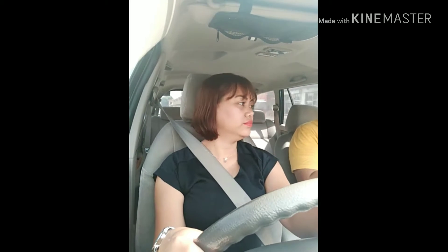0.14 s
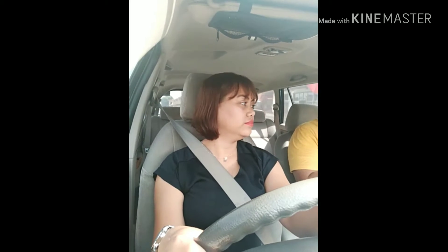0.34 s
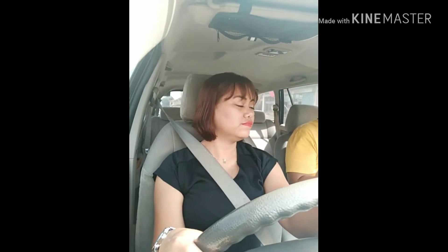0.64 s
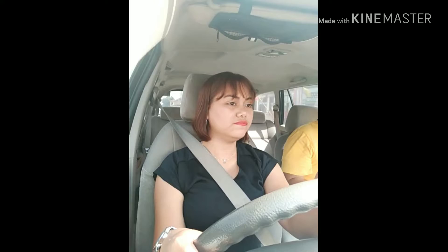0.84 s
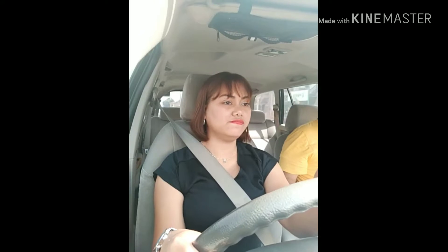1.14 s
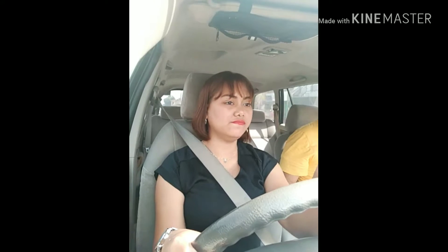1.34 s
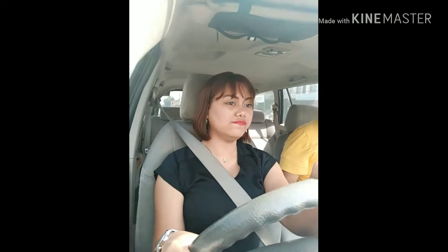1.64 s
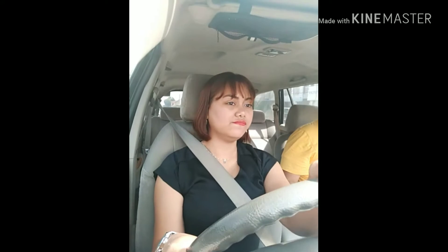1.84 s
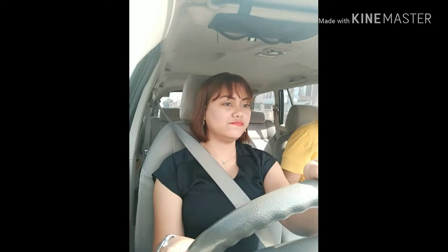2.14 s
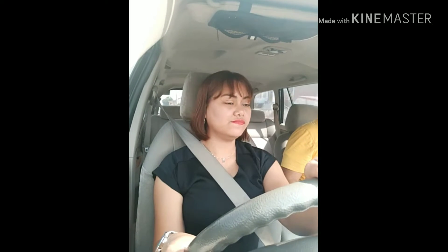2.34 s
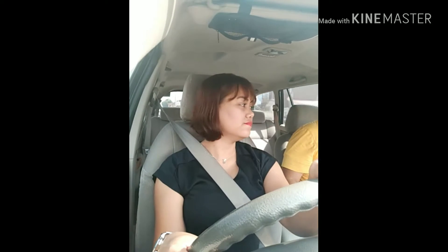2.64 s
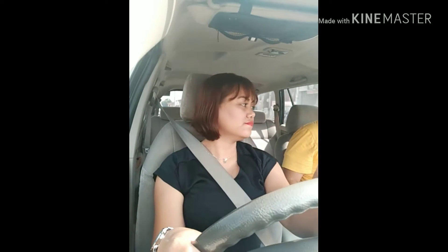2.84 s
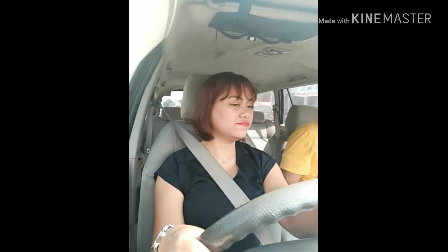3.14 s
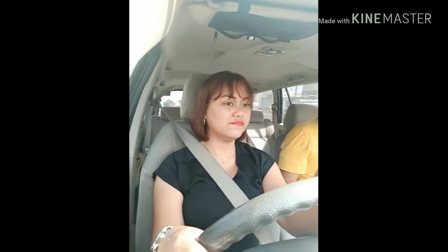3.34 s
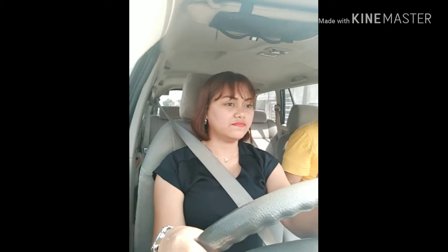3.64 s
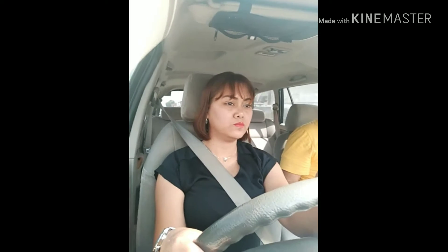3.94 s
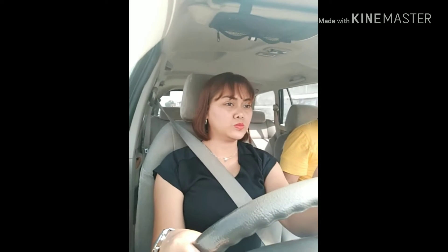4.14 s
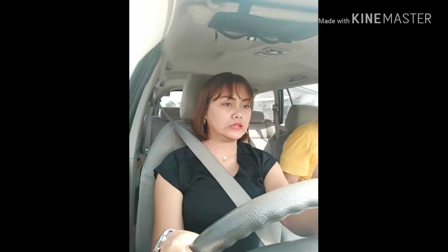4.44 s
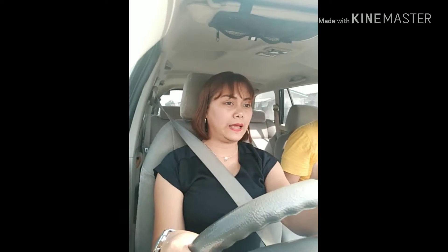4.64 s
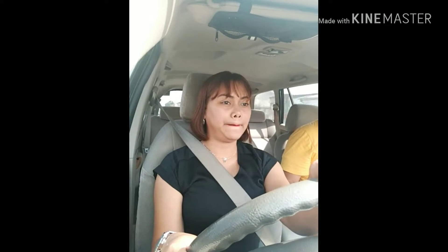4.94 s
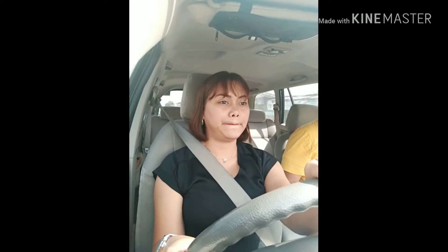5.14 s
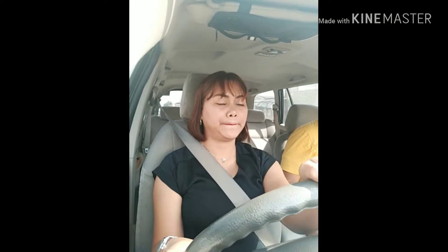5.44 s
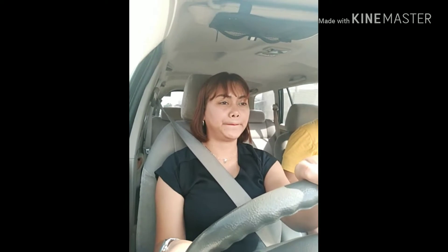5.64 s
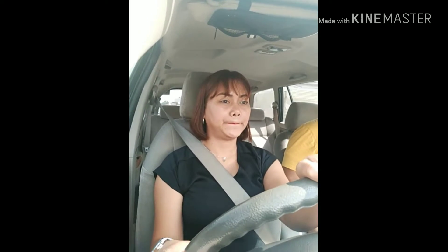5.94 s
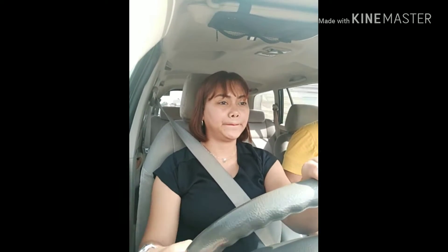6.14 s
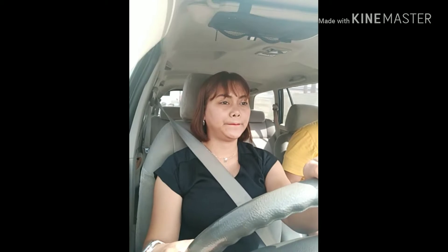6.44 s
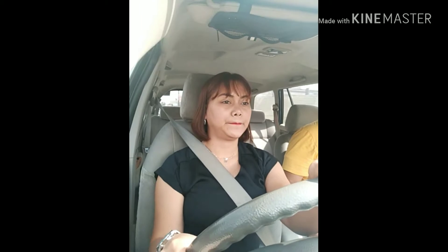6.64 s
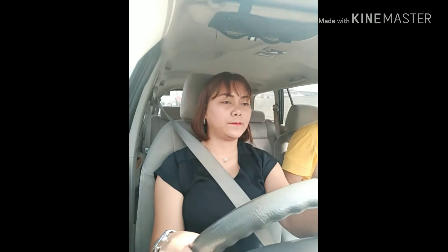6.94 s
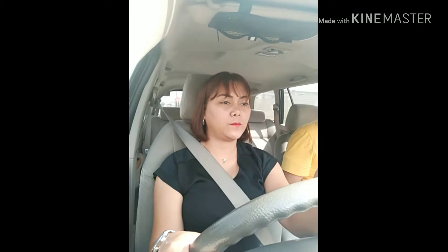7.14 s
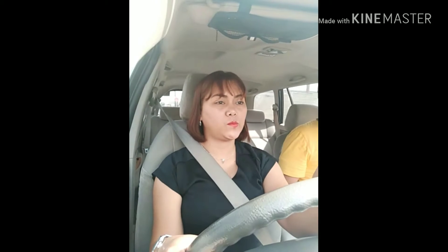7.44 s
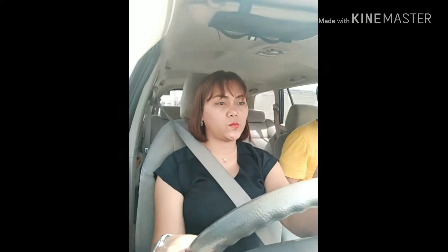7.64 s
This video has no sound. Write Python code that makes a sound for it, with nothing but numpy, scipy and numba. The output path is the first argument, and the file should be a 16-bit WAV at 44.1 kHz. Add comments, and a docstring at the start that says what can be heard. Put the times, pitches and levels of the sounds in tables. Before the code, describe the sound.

A phone in a closed car captures boomy tyre and road noise, throbbing irregularly, with muffled thuds from bumps. Midway a rough, low buzzing drum from a ribbed road surface swells far above everything, wavering and clattering the trim, then dies away. Tiny gritty ticks come mostly from the left, one of them clear late on. A very faint airy vent whistle and soft wind on the glass stay underneath.

```python
"""Inside a car at steady speed: shaped noise makes the road roar, and short swells make the bumps boom.
For about two seconds the tyres cross a ribbed strip: tones at multiples of the rib rate drum the body,
and random clicks ring the loose trim. Trim also ticks on the left, an air vent whistles faintly in
narrow bands of noise, and wind hisses on the glass.
A phone with two microphones hears the bass much alike on both sides and the treble apart."""
import sys
import numpy as np
from scipy import signal
from scipy.fft import rfft, irfft, next_fast_len
from scipy.io import wavfile
from scipy.ndimage import uniform_filter1d
from numba import njit

SR = 44100
rng = np.random.default_rng(int(sys.argv[2]) if len(sys.argv) > 2 else 0)


def output_pcm(signal):
    """Save a mono or channel-first signal as 16-bit PCM at the path in sys.argv[1].

    Samples are clipped to [-1, 1] before scaling.
    """
    pcm = np.clip(np.atleast_2d(signal).T, -1, 1) * 32767
    wavfile.write(sys.argv[1], SR, np.round(pcm).astype(np.int16))


N = 343085
TIME_S = np.arange(N) / SR
PORT_LAG = 17  # samples between the microphones for sound along the phone
OPPOSITE = np.array([[1], [-1]])  # left as is, right turned upside down


def undb(db):
    """Turn decibels into a plain multiplier."""
    return 10 ** (np.asarray(db) / 20)


def level(x, db):
    """Set the average (RMS) strength of a sound."""
    return x * undb(db) / np.sqrt(np.mean(x ** 2))


def curves(table):
    """Draw straight lines between the rows of a table: one curve for each column after the time."""
    s, *columns = np.transpose(table)
    return [np.interp(TIME_S, s, column) for column in columns]


def shape(x, points):
    """Colour a sound by (pitch_hz, level_db) points."""
    size = next_fast_len(N)
    hz, db = np.transpose(points)
    log_hz = np.log(np.arange(1, size // 2 + 2) * SR / size)
    gain = undb(np.interp(log_hz, np.log(hz), db))
    return irfft(rfft(x, size) * gain, size)[..., :N]


@njit
def svf(x, hz, width):
    """State-variable band-pass: lets through a band whose centre may move, with gain 1 there."""
    y, band, low = np.empty(len(x)), 0., 0.
    for i in range(len(x)):
        g, damping = np.tan(np.pi * hz[i] / SR), width / hz[i]
        v = (band + g * (x[i] - low)) / (1 + g * (g + damping))
        band, low, y[i] = 2 * v - band, low + 2 * g * v, damping * v
    return y


def steep_band(x, hz, width):
    """Apply the same resonance twice, so that its slopes are steep."""
    return svf(svf(x, hz, 1. * width), hz, 1. * width)


def ring(x, modes):
    """Add up steep resonances: rows of pitch_hz, width_hz (of each pass), level_db."""
    return sum(undb(db) * steep_band(x, hz * np.ones(N), width) for hz, width, db in modes)


def walk(rate):
    """A wandering curve: random values held 1 / rate seconds, smoothed twice; spread near 1."""
    hold = int(SR / rate)
    steps = np.repeat(rng.standard_normal(N // hold + 1), hold)
    return 1.03 * uniform_filter1d(uniform_filter1d(steps, hold), hold)[:N]


def noise():
    """Plain hiss, equally strong at all pitches."""
    return rng.standard_normal(N)


def grains(rate, spread_db):
    """Random clicks, rate per second on average, a few much louder than the rest."""
    return noise() * (rng.random(N) < rate / SR) * undb(spread_db * rng.exponential(size=N))


def flicker(x, db):
    """Narrow bands waver alone, like panel resonances that ring up and fade within some 20 ms."""
    spectrum = signal.stft(x, nperseg=512)[2]
    field = uniform_filter1d(rng.standard_normal(spectrum.shape), size=3, axis=1) * np.sqrt(3)
    return signal.istft(spectrum * undb(db * field), nperseg=512)[1][:N]


def patchy(points, flicker_db):
    """Coloured noise whose overlapping bands, half an octave apart, throb each alone."""
    size = next_fast_len(N)
    octave = np.log2(np.arange(1, size // 2 + 2) * SR / size)
    whole, out = rfft(shape(noise(), points), size), 0
    for centre in np.arange(12, 29) / 2:
        band = np.clip(1 - 2 * abs(octave - centre), 0, 1)
        out = out + irfft(whole * band, size)[:N] * undb(2.34 * walk(28))
    return flicker(out, flicker_db)


def road():
    """Uneven asphalt: deep heave, boom and higher roar are noises that throb in short patches."""
    # roughness of the asphalt: start_s, boom_db, heave_db, roar_db (all relative)
    roughness = [(0, -30, -43, -34), (.35, -35.5, -42, -33.5), (.85, -27.5, -41, -31),
                 (1.55, -25, -38, -32.5), (1.9, -31, -51, -34.5), (2.5, -35, -46, -36),
                 (2.8, -25, -32, -28.5), (5.0, -23, -34.5, -30), (5.2, -33, -44, -30),
                 (5.5, -31.5, -46, -28.5), (5.8, -32, -32, -35.5), (6.14, -28, -25, -32.5),
                 (6.65, -36.5, -55.5, -38.5), (7.0, -33, -52, -31.5), (7.4, -32.5, -47, -36),
                 (7.78, -30.5, -41, -32)]
    # colour of the boom and of the roar in the cabin: pitch_hz, level_db (relative)
    boom_colour = [(15, -52), (25, -21.5), (81, 0), (129, -2.5), (188, -10.5), (220, -9.5), (290, -17.5),
                   (480, -120)]
    roar_colour = [(76, -37.5), (130, -11.5), (189, -6), (231, -3.5), (279, -3.5), (392, -11), (480, -12),
                   (620, -37), (1060, -120)]
    boom_db, heave_db, roar_db = curves(roughness)
    throb = walk(20)  # shared by all three
    heave = level(ring(noise() * undb(3.2 * throb), [(46.3, 38, 0)]), -1.5)
    boom = level(shape(noise() * undb(5.3 * throb + 1.3 * walk(30)), boom_colour), -1.3)
    roar = level(shape(noise() * undb(2.6 * throb + 6.4 * walk(24)), roar_colour), -4.0)
    return heave * undb(heave_db) + boom * undb(boom_db) + roar * undb(roar_db)


def bumps():
    """Each bump is a soft lump of a few cycles in the floor pan, with a dull thud of the whole body."""
    # the larger bumps under the wheels: middle_s, level_db (peak of the lump), pitch_hz
    large = [(0.154, -22, 125), (0.16, -25.5, 280), (0.198, -22, 247), (0.234, -24, 88),
             (0.383, -25.5, 337), (0.449, -22.5, 112), (0.491, -23, 104), (0.579, -18, 92),
             (0.647, -22.5, 141), (0.733, -24.5, 131), (0.767, -21.5, 269), (0.812, -19, 111.5),
             (0.859, -20, 282), (0.897, -23.5, 218), (1.057, -23.5, 162), (1.186, -20.5, 216),
             (1.232, -22, 109), (1.312, -22.5, 142), (1.371, -23, 287), (1.394, -21, 128), (1.442, -17, 89),
             (1.515, -20.5, 85), (1.586, -23, 143), (1.758, -25.5, 227), (1.95, -25, 274),
             (2.008, -20.5, 100.4), (2.146, -24, 249), (2.239, -23, 88), (2.526, -24.5, 90),
             (2.574, -25.5, 80.6), (2.616, -23, 111.7), (2.682, -21.5, 321), (5.063, -20, 203),
             (5.211, -20.5, 321), (5.303, -21.5, 163), (5.399, -20.5, 308), (5.501, -26, 300),
             (5.665, -17, 127.3), (5.802, -19, 80.6), (5.811, -22.5, 159), (5.87, -26.5, 322),
             (5.917, -22, 80), (5.986, -21.5, 292), (6.123, -17.5, 160), (6.227, -21, 257),
             (6.28, -24, 101), (6.37, -25, 255), (6.404, -22.5, 176), (6.578, -22.5, 222),
             (6.798, -24.5, 119), (6.839, -22.5, 244), (6.871, -19.5, 264), (6.914, -25, 220),
             (7.0, -24.5, 334), (7.115, -21.5, 248), (7.189, -19.5, 226), (7.328, -18.5, 146),
             (7.383, -24, 273), (7.601, -23.5, 247), (7.649, -25, 252)]
    small_count, small_db, small_spread_db = 40, -29.5, 2.5
    lowest_hz, highest_hz = 130, 400  # of the small bumps
    width_cycles = 3  # at half height
    lump, thud = np.zeros(N + SR), np.zeros(N + SR)
    t = np.arange(-SR // 8, SR // 8) / SR
    when, size, pitch = rng.random((small_count, 3)).T
    small = np.transpose([when * N / SR, small_db + small_spread_db * (2 * size - 1),
                          lowest_hz * (highest_hz / lowest_hz) ** pitch])
    rows = np.vstack([small, large])
    for (s, db, hz), turn in zip(rows, rng.random((len(rows), 1))):
        swell = undb(db) * .5 ** ((2 * t * hz / width_cycles) ** 2)
        lump[int(s * SR):][:len(t)] += swell * np.sin(2 * np.pi * (hz * t + turn))
        thud[int(s * SR):][:len(t)] += swell
    body = level(ring(noise(), [(91, 110, 1.5), (258.6, 160, -4)]), -11.0)
    return lump[SR // 8:][:N] + thud[SR // 8:][:N] * body


def strip():
    """Four wheels cross the ribs out of step, so each multiple of the rib rate drifts alone; trim rattles."""
    # swells along the ribbed strip: start_s, drum_db, knock_db, shake_db (of the trim; all relative)
    swells = [(2.7, -45.5, -56.5, -75.5), (2.9, -28, -46, -62), (3.05, -16, -22, -42),
              (3.3, -17, -22.5, -42), (3.55, -14.5, -21, -42.5), (3.78, -17, -23, -44.5),
              (3.87, -15, -19, -42), (3.93, -24, -22.5, -43), (4.0, -16, -21, -44),
              (4.18, -16.5, -20, -45.5), (4.29, -22.5, -23.5, -52), (4.43, -26, -29.5, -53),
              (4.54, -23, -25, -58.5), (4.75, -30.5, -30, -59), (4.9, -16, -25.5, -55),
              (4.97, -29.5, -44, -62.5), (5.15, -42, -49.5, -66)]
    # the drum: multiple (of the rib rate), level_db (relative), share (of the swell that it follows),
    # beat_db (depth), drift_db_per_s
    drum_tones = [(1, -6, .35, 1, -1.5), (2, -5, 0.69, 4.0, -2), (3, -2, 0.97, 3.0, -2.5),
                  (4, -2, 1.06, 3.2, 0)]
    # the knock: multiple (of the rib rate), level_db (relative)
    knock_tones = [(5, -4), (6, 0.5), (7, -7), (8, -14), (9, -17), (10, -14), (11, -26), (12, -23.5)]
    # the lowest multiple sets in late and stops short: bend points [s]
    bounce_s = [3.0, 3.12, 4.96, 5.02]
    # loose trim: pitch_hz, width_hz (of each pass), level_db (relative)
    trim = [(780, 480, 16), (1478, 300, 6), (1903, 590, 6.5), (2560, 970, -4), (3660, 330, -4.5),
            (4260, 1200, -10), (5880, 1600, -8), (11370, 6500, -20.5), (14500, 4000, -16.5)]
    rib_hz, rib_rise_hz_per_s, middle_s = 41.92, .75, 3.9  # the car gains a little speed
    beat_rate = 14  # new random values per second: wheels fall in and out of step
    drum_db, knock_db, shake_db = curves(swells)
    since = TIME_S - middle_s
    hz = rib_hz + rib_rise_hz_per_s * since
    turns = np.cumsum(hz) / SR
    top_db = drum_db.max()
    beat_growth = np.clip(1 + .4 * since, .3, 2)  # the wheels lose step further along the strip

    tones = []
    for k, db, share, beat_db, drift in drum_tones:
        follow_db = share * (drum_db - top_db) + drift * since
        tones.append((k, top_db + db + follow_db + beat_db * beat_growth * walk(beat_rate)))
    tones[0] = (1, tones[0][1] + np.interp(TIME_S, bounce_s, [-8.5, 0.5, 0, -15]))
    tones += [(k, knock_db + db + 2.57 * walk(9)) for k, db in knock_tones]

    drum = np.zeros((2, N))
    for k, db in tones:
        roughness = min(.13 * k, 1.1)  # higher multiples are noisier
        wobble_turns = rng.random() + 0.027 * k * walk(7)
        steady = np.sqrt(2) * np.sin(2 * np.pi * (k * turns + wobble_turns))
        blur, apart = (level(steep_band(noise(), k * hz, 45.), 0) for _ in range(2))
        drum += undb(db) * (steady + roughness * blur + .09 * apart * OPPOSITE)

    jolt_db = 2.2 * walk(35)  # shakes all the trim together

    def rattle():
        """Clicks ring every trim mode, each with its own unsteadiness."""
        rung = sum(ring(grains(2500, 1.3) * undb(2.4 * walk(30) + jolt_db), [mode]) for mode in trim)
        return level(flicker(rung, 5.6), 5.8)

    left, right = rattle(), rattle()
    shake = np.array([left, 0.19 * np.roll(left, PORT_LAG) + 1.15 * right]) * undb(shake_db)
    on = np.interp(TIME_S, [2.62, 2.72, 5.1, 5.2], [0, 1, 1, 0])
    return on * (drum + shake)


def ticks():
    """Short gritty creaks: clicks ring five groups of trim modes, near the left microphone."""
    # trim ticks: start_s (before the group's lag), level_db (relative), tilt_db_per_octave (upward),
    # top_db (extra, second group), low_db (extra, last group)
    tick_rows = [(0.803, -49.5, -5, 5, 1), (1.3069, -60.5, 1, 0, 0), (1.753, -60.5, 0.5, 9, 0),
                 (1.836, -58.5, -0.5, -3, 2), (2.074, -60, 0, -5, 3), (2.293, -64, 0, 6, 11),
                 (2.665, -56, -1, 4, -10), (2.742, -45.5, -2, 5, 4.5), (2.77, -58, 4.5, 10, 0),
                 (4.017, -51.5, -7, 9, 10.5), (4.6975, -55, -3, 4, 2), (4.843, -64, 4.5, 13, 9),
                 (4.923, -57, -2.5, -8, -1), (5.381, -54, -3.5, 3, -3), (5.724, -54.5, -9, 4, 8.5),
                 (6.063, -52.5, -4, 5, 5.5), (6.13, -59, 0, 8, 2), (6.3696, -27, -4.5, -3, -2),
                 (6.403, -49, -10, 1, 1), (7.62, -46.5, 0, 1, 1)]
    # modes of a creak in five groups: pitch_hz, width_hz (of each pass), level_db (relative)
    creak = [
        [(10200, 2300, -1), (11600, 1800, 4.5)],
        [(14000, 2000, -3), (15300, 700, 5)],
        [(5260, 920, -7.5), (6060, 1700, -0.5)],
        [(3080, 340, -3), (3610, 490, 2.5), (3950, 490, -1)],
        [(1590, 220, -0.5), (2095, 250, 3), (2350, 300, -1.5)],
    ]
    # lag of each group [s]: the low modes come late
    lag_s = (-.006, -.006, -.005, -.004, .001)
    base_s, s_per_db, base_db = .027, .0006, -57  # louder = longer
    pan_db, tilt_from_hz = 7, 3600
    t = np.arange(SR // 5) / SR
    out = 0
    for group, modes in enumerate(creak):
        push = np.zeros((2, N + SR))
        octaves = max(np.log2(modes[-1][0] / tilt_from_hz), 0)
        for s, db, tilt, top_db, low_db in tick_rows:
            progress = np.clip(t / (base_s + s_per_db * (db - base_db)), 0, 1)
            body = np.sin(np.pi * progress) ** 2 + 0.66 * progress * np.exp(-t / 0.027)  # swell and tail
            group_db = db + tilt * octaves + top_db * (group == 1) + low_db * (group == 4)
            first = int((s + lag_s[group]) * SR)
            push[:, first:][:, :len(t)] += undb(group_db + pan_db / 2 * OPPOSITE) * body
        near, far = (level(ring(grains(5000, 1.2), modes), -4.5) for _ in range(2))
        out = out + push[:, :N] * np.array([near, .6 * np.roll(near, PORT_LAG) + .8 * far])
    return out


def vent():
    """Air over a vent edge: a narrow band of hiss that wavers, breaks up and twice jumps to a new pitch."""
    # three held pitches: start_s, end_s, start_hz, end_hz, start_db, full_db (relative)
    whistles = [(0, 6.08, 5560, 5610, -74, -64.5), (6.12, 6.97, 4490, 4500, -72, -70.5),
                (7.0, 7.8, 4830, 4960, -70, -69)]
    edge_s, swell_s, width_hz = .03, 2.25, 210  # width of each filter pass
    out = 0
    for start, end, hz0, hz1, db0, db1 in whistles:
        hz = np.interp(TIME_S, [start, end], [hz0, hz1]) * (1 + .007 * walk(40) + .009 * walk(3))
        on = np.clip(np.minimum(TIME_S - start, end - TIME_S) / edge_s, 0, 1)
        sides = [level(steep_band(noise(), hz, width_hz), side_db) for side_db in (3.5, 1.5)]
        swell_db = np.interp(TIME_S, [start, min(start + swell_s, end)], [db0, db1])
        out = out + np.array(sides) * on * undb(swell_db + 3.5 * walk(40) + .8 * walk(8))
    return out


def air():
    """Wind and tyre hiss through the glass: patchy noise, part alike and part opposite on the two sides."""
    # strength of the wind on the glass: start_s, level_db (relative)
    wind = [(0, 0), (1, -1), (2, 0), (3, 0), (4.5, 3.5), (5.5, 1.5), (6.3, 1.5), (7, 0), (7.78, 2)]
    # colour of the hiss, alike and opposite in the microphones: pitch_hz, level_db (relative)
    alike_colour = [(190, -15.5), (330, -3.5), (495, -8), (555, -1.5), (663, -11.5), (903, -11.5),
                    (1200, -25), (1670, -24.5), (2730, -34.5), (4890, -44), (6500, -48.5), (8500, -58),
                    (11500, -52), (16000, -50.5)]
    opposite_colour = [(30, -20), (60, -3.5), (400, -4), (569, 5), (649, -6.5), (937, 0), (1810, -13.5),
                       (2830, -20.5), (5170, -30.5), (6500, -36.5), (8500, -44.5), (11500, -37),
                       (16000, -44)]
    wind_db, = curves(wind)
    alike = level(patchy(alike_colour, 3.4), -39)
    opposite = level(patchy(opposite_colour, 2.5), -44.5)
    return undb(wind_db) * (alike + opposite * OPPOSITE)


def scene():
    """Add the cabin sounds, lean each pitch to one side, then add the ticks and the whistle."""
    # lean of the cabin sound: pitch_hz, level_db (left minus right)
    lean = [(60, 0), (110, -1.5), (200, -1.0), (380, -0.5), (700, -3.5), (1290, -0.5), (2380, 4.5),
            (4400, 1.5), (8120, 3.5), (15000, 3)]
    low = road() + bumps()
    cabin = low + strip() + air()
    hz, db = np.transpose(lean)
    left = shape(cabin[0], np.transpose([hz, db / 2]))
    right = shape(cabin[1], np.transpose([hz, -db / 2]))
    return np.array([left, right]) + ticks() + vent()


def record(dry):
    """The phone cuts the deepest bass, rounds the loudest peaks and cuts the top."""
    low_cut = signal.sosfilt(signal.butter(4, 33., "high", fs=SR, output="sos"), dry)
    rounded = .85 * np.tanh(low_cut / .85)
    top_cut = signal.ellip(10, .2, 80, 15650, fs=SR, output="sos")
    return signal.sosfilt(top_cut, rounded)


dry = scene()
out = record(dry)
output_pcm(out)
```